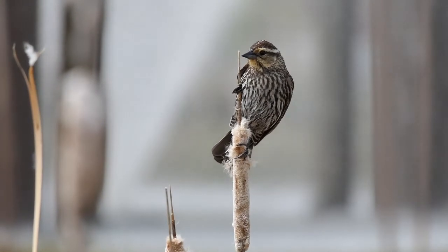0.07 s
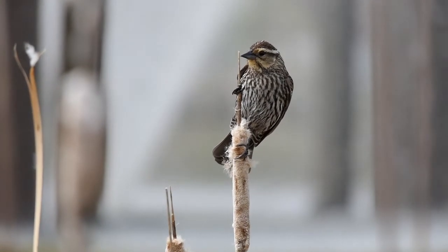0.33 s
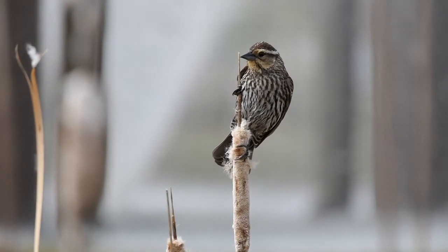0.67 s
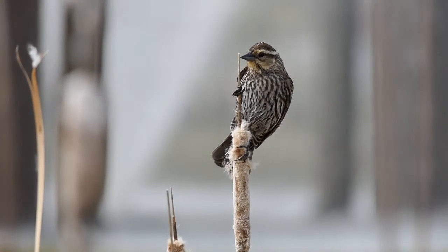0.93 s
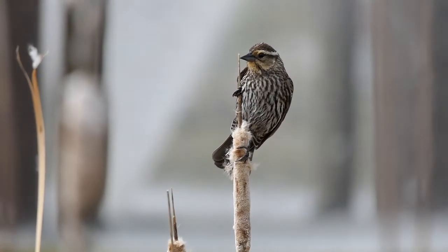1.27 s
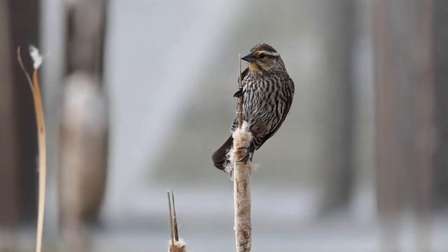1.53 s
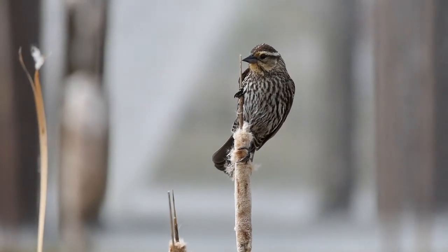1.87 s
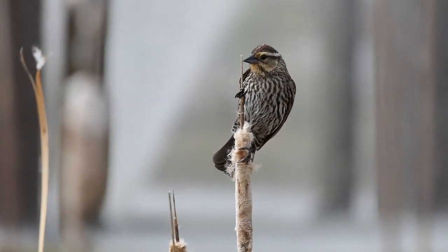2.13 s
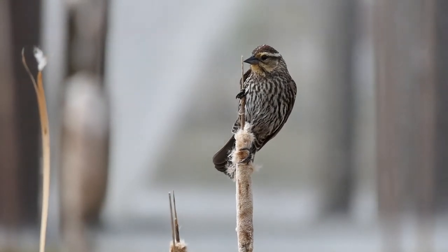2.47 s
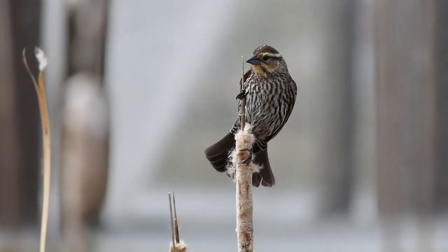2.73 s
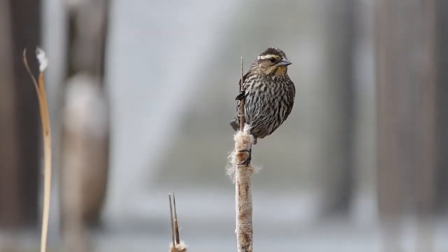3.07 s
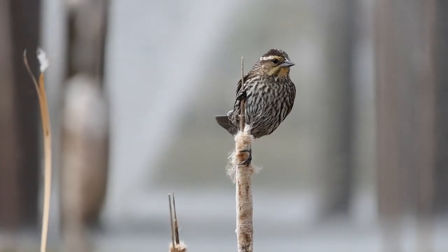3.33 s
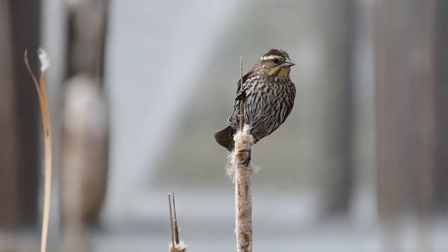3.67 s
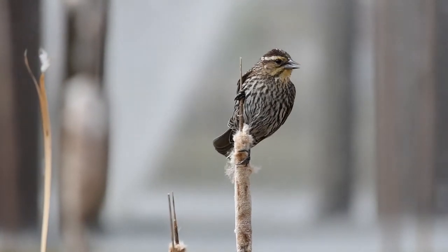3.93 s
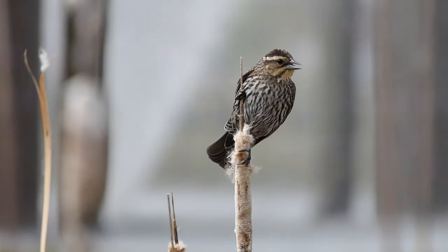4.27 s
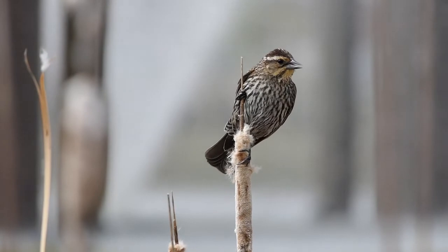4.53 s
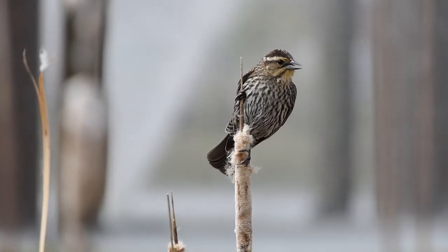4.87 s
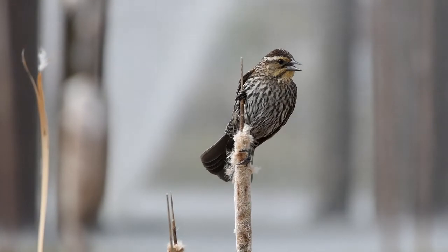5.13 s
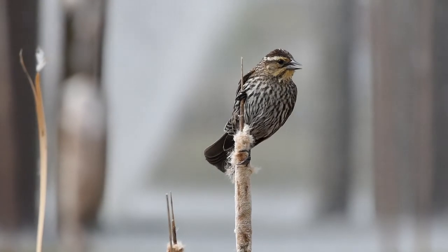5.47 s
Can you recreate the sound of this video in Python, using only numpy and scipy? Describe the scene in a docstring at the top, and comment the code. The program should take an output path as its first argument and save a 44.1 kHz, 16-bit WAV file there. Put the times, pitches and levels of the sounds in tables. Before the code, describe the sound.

Distant engines drone and traffic washes softly across a marsh, with a few dry ticks from a cattail right by the microphone. A close blackbird gives short raspy calls, then two long, piercing, down-slurred whistles about two seconds apart, a little to the left. Near the end, more raspy calls and a rapid series of nine high chirps come from the centre, building in loudness with almost no echo.

```python
"""Far engines and a wash of traffic come first, with a dry tick from a cattail stalk at the microphone.
In the marsh, a red-winged blackbird gives two long down-slurred whistles, off to the left. From straight
ahead come harsh "chek" calls, snaps of the syrinx ringing in throat and bill, and late on a run of nine
arched chirps, growing louder. Reeds and boardwalk scatter the near sounds faintly, and the recorder's
gain control ducks everything a little during the whistles."""
import sys
import numpy as np
from scipy import signal
from scipy.fft import rfft, irfft, next_fast_len
from scipy.io import wavfile
from scipy.ndimage import uniform_filter1d, map_coordinates

SR = 44100
rng = np.random.default_rng(int(sys.argv[2]) if len(sys.argv) > 2 else 0)


def waveform_to_disk(signal):
    """Save audio, clipped to [-1, 1], as 16-bit WAV at the path in sys.argv[1]."""
    frames = np.transpose(np.atleast_2d(signal))
    scaled = np.clip(frames, -1, 1) * 32767
    samples = np.round(scaled).astype(np.int16)
    wavfile.write(sys.argv[1], SR, samples)


N = 247401
TIME = np.arange(N) / SR


# Whistles, left of the microphone: t/s, length/s, opening push level/dB, swell level/dB,
# swell crest after/s, brief dip after/s, release/s, end bend/Hz
WHISTLE_NOTES = [(1.476, .512, -2.3, -0.5, 0.29, 0.16, 0.01, -90),
                 (3.502, 0.513, -1.9, -3, 0.32, 0.184, 0.058, 75)]
def whistles():
    """The blackbird, near and to the left: an almost pure tone with flickering overtones and breath."""
    hz, strength = phrase(whistle_note, WHISTLE_NOTES)
    phase = cycle(hz + 4 * wobble(260) + 2 * wobble(40))
    tone = pan(amp(-.6 + .16 * wobble(150)) * np.sin(phase), left_db=7)
    second_db = along([(2460, -44), (2550, -34.5), (2800, -48)], hz) + 3.5 * wobble(40)
    second = amp(second_db) * np.sin(2 * phase + .9 * wobble(400))
    # the third partial is weak while the pitch is high, and reaches the two sides out of step
    third_db = along([(2600, -22.8), (2800, -21), (3300, -30)], hz) + 2 * np.array([wobble(37), wobble(49)])
    side_phase = np.array([[2.2], [2.2 + np.pi / 2]])
    third = amp(third_db) * np.sin(3 * phase + side_phase + .25 * wobble(500) + .2 * wobble(60))
    air_colour = [(1500, -24), (3000, 16), (4500, -6), (7500, 0), (11000, -6), (12500, -16)]
    air = amp(-31.5) * rush(air_colour, patchy_db=10)
    flick_hz, flick = phrase(flick_note, WHISTLE_NOTES)
    voice = strength * (tone + second + np.sqrt(strength) * third + strength * air)
    return voice + flick * np.sin(cycle(flick_hz))


def whistle_note(t, length, push_db, swell_db, crest_s, dip_s, release_s, bend_hz):
    """Pitch and strength of a whistle: a quick hook on top of a slow slide down to the held note."""
    held_hz, slide_hz, hook_hz = 2452, 350, 642
    fall = t - .013  # time since the top of the hook
    hook = np.where(fall < 0, bell(fall, .013), bell(fall, .027))
    slide = np.exp(-np.maximum(fall, 0) / .105)
    bend = np.exp(np.minimum(t - length, 0) / release_s)
    hz = held_hz + slide_hz * slide + hook_hz * hook + bend_hz * bend
    push = amp(push_db) * bell(t - .049, width=.15)
    swell = amp(swell_db) * bell(t - crest_s, width=.22)
    gate = ramp(t, .038) ** 1.2 * ramp(length - t, release_s)
    dip = amp(-4.5 * bell(t - dip_s, width=.012))
    return hz, gate * np.maximum(push, swell) * dip


def flick_note(t, *_):
    """Pitch and strength of the faint up-flick that leads into a whistle."""
    lead_s, width_s, rise_hz_per_s = .012, .0059, 100000
    t = t + lead_s
    return 4000 + rise_hz_per_s * np.clip(t, -2 * width_s, 2 * width_s), amp(-26) * bell(t, width_s)


# Chirps, straight ahead: t/s, length/s, level/dB, growth over the note/dB, top f/Hz, sag/Hz, sag after/s
CHIRP_NOTES = [(4.515, 0.038, -14, -1, 3815, 264, 0.015), (4.621, 0.043, -12.5, -7, 3474, 512, 0.025),
               (4.732, .048, -10, 1, 3560, 280, 0.021), (4.847, 0.053, -10.5, 0, 3364, 89, 0.026),
               (4.962, 0.059, -9.5, 3, 3213, 59.95, 0.03), (5.087, 0.046, -10.5, -6, 3187, 89.8, 0.025),
               (5.201, .055, -7.5, 5, 3440, 535, .029), (5.331, .053, -5.5, 2.5, 3315, 188.2, 0.023),
               (5.467, 0.049, -5, 4, 3230, 30.2, 0.023)]
def chatter():
    """Arched chirps with hoarse overtones; each breaks into a rattle as its pitch falls away."""
    hz, strength = phrase(chirp_note, CHIRP_NOTES)
    breaking = sum(bell(TIME - s - length + .0012, .0094) for s, length, *_ in CHIRP_NOTES)
    phase = cycle(hz + (62 + 120 * breaking) * wobble(900))
    rattle = 1 + .37 * np.minimum(breaking, 1) * np.sin(cycle(430 + 70 * wobble(90)))
    flutter = amp(-1.7 + 2 * np.sin(cycle(85 + 15 * wobble(30))) + .96 * wobble(200))
    second = amp(-26.5) * np.sin(2 * phase + wobble(1200))
    third_db = along([(2900, -32), (3300, -29.5), (3650, -32)], hz)
    partials = np.sin(phase) + second + amp(third_db) * np.sin(3 * phase + wobble(1200))
    voice = strength * flutter * (rattle * partials + amp(-30) * rasp(rate=3700, grain_db=6))
    closing = sum(amp(db) * bell(TIME - s - length - .004, .0096) for s, length, db, *_ in CHIRP_NOTES)
    return pan(voice + amp(-14.5) * closing * rasp(rate=1500, grain_db=-1), left_db=-.7)


def chirp_note(t, length, db, growth_db, top_hz, sag_hz, sag_s):
    """Pitch and strength of a chirp: it scoops up, sags midway and plunges, loudest near the top."""
    scoop_hz, plunge_hz, plunge_s = 624, 923, .015
    off_top_db_per_khz, edge_s = -12, .00054
    off_top = scoop_hz * bell(np.maximum(t, 0), .005) + plunge_hz * ramp(t - length + plunge_s, plunge_s)
    hz = top_hz - off_top - sag_hz * bell(t - sag_s, width=.0065)
    level_db = db + growth_db * (ramp(t, length) - .5) + off_top_db_per_khz * off_top / 1000
    return hz, amp(level_db) * ramp(t + edge_s, edge_s) * ramp(length + edge_s - t, edge_s)


# Dry calls, straight ahead: loudest t/s, level/dB, half length/s, centre f/Hz
CHEK_CALLS = [(0.472, -13, 0.017, 3350), (0.725, -21, .011, 3200), (.792, -13, 0.017, 2880),
              (3.966, -15, 0.017, 2860), (4.173, -13.5, 0.015, 3000), (4.4, -25.5, 0.025, 3020),
              (5.07, -22.5, 0.011, 3300)]
def cheks():
    """Short harsh bursts of snaps, pulsing unevenly; the bill opening shifts their colour."""
    snaps = rasp(rate=4700, grain_db=-1)
    # the membranes swing only so far, which evens out the strongest snaps
    swing = np.sqrt(np.abs(uniform_filter1d(snaps ** 2, size=110)) + .15)
    source = snaps / swing * (1 + .36 * np.sin(cycle(440 + 90 * wobble(200))))
    out = np.zeros(N)
    for s, db, half, centre_hz in CHEK_CALLS:
        swell = bell(TIME - s, half) + .18 * bell(TIME - s, 2 * half)
        burst = filtered(swell * source, lambda hz: 1 + amp(-4.5) * bell(hz - centre_hz, 450))
        out += amp(db) * burst * np.linalg.norm(swell) / np.linalg.norm(burst)
    return pan(out, left_db=-.3)


# Resonance of the bird's throat and bill: f/Hz, relative level/dB
THROAT_COLOUR = [(1200, -36), (2000, -14.5), (2500, 0.5), (2900, -3.5), (3500, 3.5), (4000, -18),
                 (4600, -20), (6000, -27), (7600, -19), (8800, -45), (10000, -27), (11300, -43),
                 (12200, -76)]
def rasp(rate, grain_db):
    """Irregular snaps of the syrinx, rate a second, ringing briefly in throat and bill; rms 1."""
    snaps = (rng.random(N) < rate / SR) * rng.choice([-1, 1], N) * amp(grain_db * rng.standard_normal(N))
    return unit(filtered(snaps, lambda hz: amp(along(THROAT_COLOUR, hz))))


# Ticks of a cattail stalk, near and centred: t/s, level/dB
STALK_TICKS = [(0.051, -5.5), (2.827, -5), (2.894, -13), (4.59, -7)]
def stalk():
    """The dry perch ticks as the bird shifts its weight."""
    t, out = np.arange(SR // 50) / SR, np.zeros(N)
    t60 = .0062
    for s, db in STALK_TICKS:
        ring = np.sin(2 * np.pi * 2950 * t) + .82 * rng.standard_normal(len(t))
        out[round(s * SR):][:len(t)] += amp(db - 60 * t / t60) * ring
    return lowpass(out, hz=4200, steepness=6)


def marsh(x, t60):
    """A short scatter from the reeds and boardwalk around the microphone."""
    t = np.arange(SR // 2) / SR
    tail = rng.standard_normal((2, len(t))) * amp(-60 * t / t60) * (1 - np.exp(-t / .004))
    return signal.fftconvolve(x, tail / np.linalg.norm(tail[0]), axes=1)[:, :N]


# Deepest engine tone, centred: t/s, level/dB
THROB_LEVELS = [(0, -41.5), (1.3, -40.5), (1.8, -43), (4.7, -42), (5.25, -34.5), (5.61, -39)]
# Steady engine tones, a little right: f/Hz, level/dB, pitch wander/Hz, level wander/dB
ENGINE_TONES = [(109, -43.5, 0.34, 0.5), (136.7, -39.5, 0.73, 2), (310.4, -46.5, 4.5, 4.5)]
# Upper engine drone, a little right: t/s, level/dB
HIGH_DRONE_LEVELS = [(0.0, -31.5), (0.23, -38.5), (0.37, -21.5), (0.56, -23.5), (0.64, -42), (0.78, -29.5),
                     (1.19, -28.5), (1.34, -23), (1.51, -28), (2.28, -25), (2.59, -38), (2.72, -27),
                     (3.48, -27.5), (3.51, -40), (3.62, -25.5), (3.72, -40.5), (4.16, -21.5), (4.22, -36),
                     (4.33, -25), (4.58, -40), (4.62, -22), (4.84, -33), (4.94, -26), (5.5, -35),
                     (5.61, -19.5)]
def engines():
    """Engines far across the marsh: a deep throb, three steady tones and two drones."""
    (throb_db,), (high_db,) = curves(THROB_LEVELS), curves(HIGH_DRONE_LEVELS)
    throb = amp(throb_db) * np.sin(cycle(53.8 + .15 * wobble(2.8)))
    tones = sum(amp(db + sway_db * wobble(5)) * np.sin(cycle(hz + wander * wobble(4)))
                for hz, db, wander, sway_db in ENGINE_TONES)
    # the lower drone slowly recedes, and beats against a close neighbour
    beat_hz, recede_db_per_s = 5.2, -1.02
    phase = cycle(173.5 + .8 * wobble(5))
    pair = np.sin(phase) + amp(-10.5) * np.sin(phase - cycle(beat_hz + 1.515 * wobble(3)))
    low = amp(-27.5 + recede_db_per_s * TIME + .74 * wobble(3.97)) * pair
    high = amp(high_db + .94 * wobble(14)) * np.sin(cycle(239 + 1.09 * wobble(4.9)))
    return np.sqrt(2) * (throb + pan(tones + low + high, left_db=-2.5))


# Distant traffic at the microphone: t/s, rumble level/dB, wash level/dB
TRAFFIC_LEVELS = [(0, -29, -23.5), (.7, -29, -23.5), (1.3, -27, -22), (2, -30, -24), (2.5, -32, -24),
                  (2.9, -28.5, -23), (3.4, -28.5, -22.5), (4.1, -30, -23), (4.7, -28, -22),
                  (5.3, -25.5, -21), (5.61, -27.5, -19.5)]
# Spectra of its rumble, tyre wash and hiss: f/Hz, relative level/dB
RUMBLE_COLOUR = [(20, -28.5), (42, -16), (54, -5), (68, -7.5), (84, -6.5), (118, -8.5), (160, 2.5),
                 (200, 0.5), (265, 0.5), (285, -5.5), (315, -4.5), (360, -13.5), (600, -58)]
WASH_COLOUR = [(200, -51), (340, -28), (351, -26), (370, -19.5), (469, -5.5), (600, -3), (654, -0.5),
               (704, -3), (863, -9.5), (1270, -5), (1810, -10), (2030, -14), (2440, -11), (2930, -9),
               (4400, -21.5), (5720, -55), (9680, -120)]
HISS_COLOUR = [(2590, -33.5), (4400, -18.5), (4780, 1.5), (5360, 3), (6430, -1.5), (7560, 0.5),
               (9560, -11.5), (11100, -21.5), (11800, -33), (15300, -65.5), (22000, -120)]
def traffic():
    """Low rumble and a wash of far tyres, with a thin hiss that follows the wash."""
    rumble_db, wash_db = curves(TRAFFIC_LEVELS)
    rumble = pan(amp(rumble_db) * rush(RUMBLE_COLOUR, patchy_db=1), left_db=-1.5)
    wash = pan(amp(wash_db) * rush(WASH_COLOUR, patchy_db=1), left_db=-.9)
    hiss = amp(wash_db - 15) * rush(HISS_COLOUR, patchy_db=1.3)
    return rumble + wash + hiss


# Likeness of noise at the two sides of the microphone: f/Hz, correlation
STEREO_LIKENESS = [(60, 0.49), (170, 0.9), (500, 0.87), (1430, 0.89), (4130, 0.9), (11900, 0.77)]
def rush(spectrum, patchy_db):
    """Stereo noise of rms 1 with patches of gain drifting over time and frequency."""
    bins = signal.stft(rng.standard_normal((2, N)), nperseg=512)[2]
    patches = uniform_filter1d(rng.standard_normal(bins.shape[1:]), size=6, axis=0)
    patches = uniform_filter1d(patches, size=20, axis=1)
    pair = signal.istft(bins * amp(patchy_db * unit(patches)), nperseg=512)[1][:, :N]

    def mid_side_gains(hz):
        angle = np.arccos(np.clip(along(STEREO_LIKENESS, hz), -1, 1)) / 2
        return amp(along(spectrum, hz)) * [np.cos(angle), np.sin(angle)]
    mid, side = filtered(pair, mid_side_gains)
    return unit(np.array([mid + side, mid - side]))


def phrase(note, rows):
    """Pitch and strength of a series of notes; each row holds from just before its start."""
    hz, strength = np.zeros(N), np.zeros(N)
    for k, (s, *shape) in enumerate(rows):
        first = round((s - .03) * SR) if k else 0
        hz[first:], strength[first:] = note(TIME[first:] - s, *shape)
    return hz, strength


def amp(db):
    """Decibels to gain."""
    return 10 ** (np.asarray(db) / 20)


def unit(x):
    """x scaled to rms 1."""
    return x / np.sqrt(np.mean(x ** 2) + 1e-20)


def bell(t, width):
    """A smooth bump of height 1 around t = 0."""
    return np.exp(-(t / width) ** 2)


def ramp(t, length):
    """0 before t = 0, rising to 1 over length seconds."""
    return np.clip(t / length, 0, 1)


def along(points, hz):
    """(f/Hz, value) points read on a log axis."""
    f, v = np.transpose(points)
    return np.interp(np.log(hz + 1), np.log(f + 1), v)


def curves(rows):
    """One value per sample for each column after the time."""
    s, *cols = np.transpose(rows)
    return [np.interp(TIME, s, c) for c in cols]


def wobble(rate):
    """A smooth random curve, rate knots a second."""
    return map_coordinates(rng.standard_normal(int(N * rate / SR) + 4), [TIME * rate], order=2)


def cycle(hz):
    """Running phase of a tone."""
    return 2 * np.pi * np.cumsum(hz) / SR


def filtered(x, response):
    """x shaped by a gain that depends on frequency."""
    m = next_fast_len(x.shape[-1] + 8192)
    return irfft(rfft(x, m) * response(np.fft.rfftfreq(m, 1 / SR)), m)[..., :x.shape[-1]]


def lowpass(x, hz, steepness):
    """x with the treble above hz rolled off."""
    return filtered(x, lambda f: 1 / (1 + (f / hz) ** steepness))


def pan(x, left_db):
    """Stereo pair with the left side louder by left_db."""
    return x * amp([[left_db / 2], [-left_db / 2]])


def scene():
    """At the microphone: near calls and their faint scatter over far engines and traffic."""
    long_calls, short_sounds = whistles(), chatter() + cheks() + stalk()
    scatter = marsh(amp(-21) * long_calls + amp(-14.5) * short_sounds, t60=.11)
    return long_calls + short_sounds + scatter + engines() + traffic()


def record(dry):
    """The recorder: gain dips under sustained loud sound, peaks clip softly, the top treble is cut."""
    response_s, max_duck_db, knee_db, ceiling = .063, -3.3, -3.5, .94
    keep = np.exp(-1 / (response_s * SR))
    power = signal.lfilter([1 - keep], [1, -keep], np.max(dry ** 2, axis=0))
    ducked = dry * amp(max_duck_db * power ** 2 / (power ** 2 + amp(knee_db) ** 4))
    clipped = ducked / (1 + np.abs(ducked / ceiling) ** 24) ** (1 / 24)
    return lowpass(clipped, hz=12600, steepness=120)


dry = scene()
out = record(dry)
waveform_to_disk(out)
```